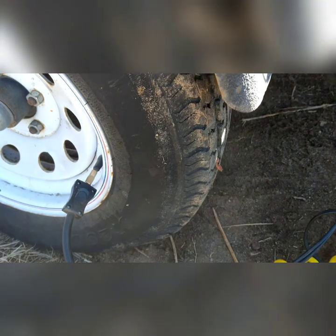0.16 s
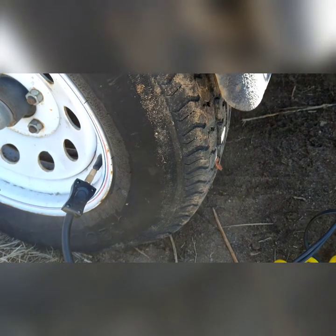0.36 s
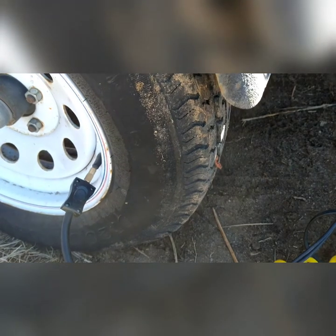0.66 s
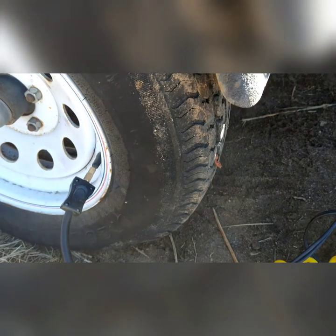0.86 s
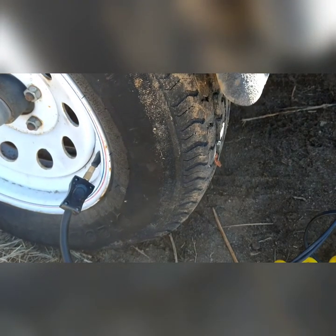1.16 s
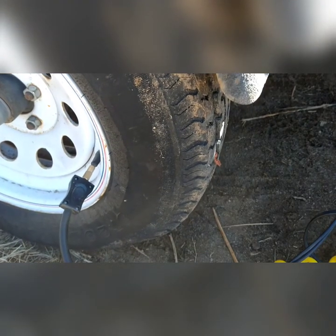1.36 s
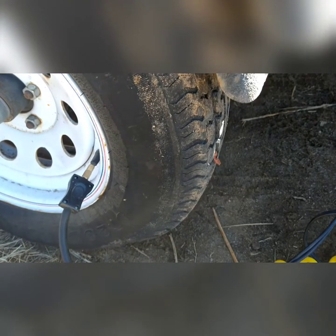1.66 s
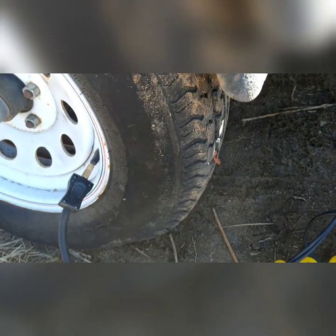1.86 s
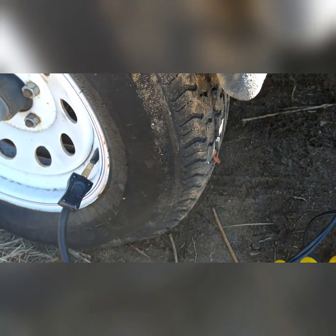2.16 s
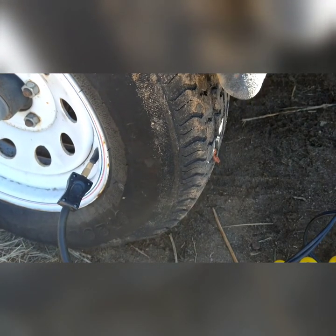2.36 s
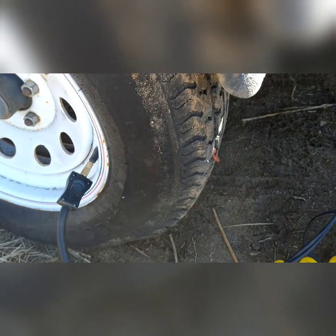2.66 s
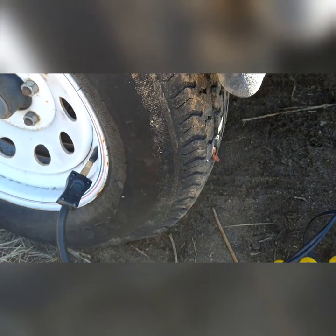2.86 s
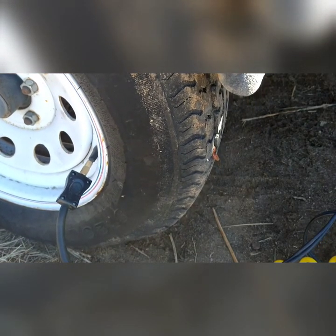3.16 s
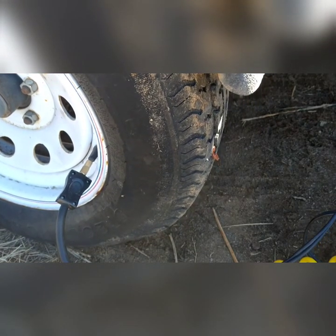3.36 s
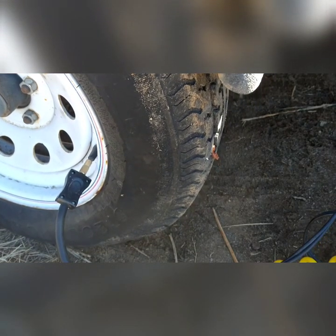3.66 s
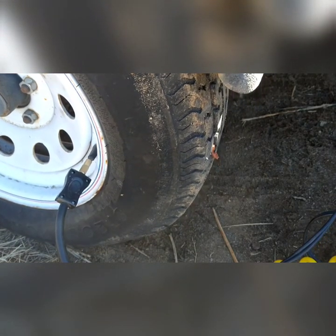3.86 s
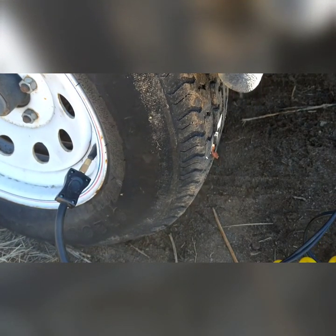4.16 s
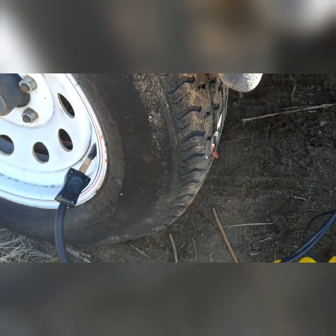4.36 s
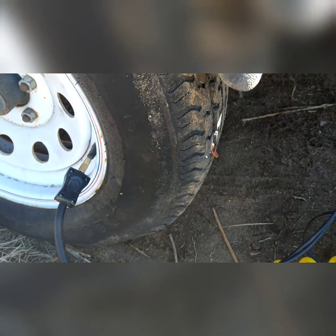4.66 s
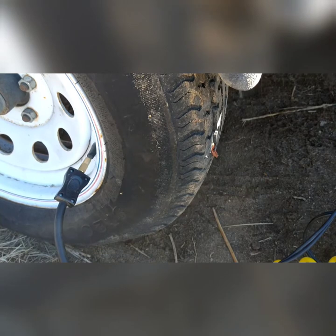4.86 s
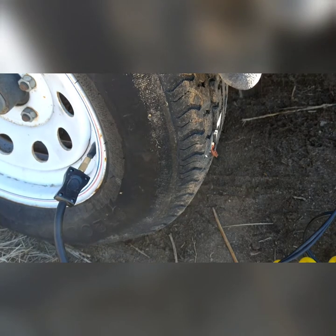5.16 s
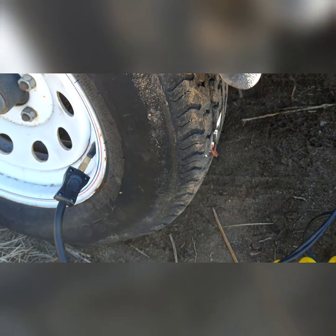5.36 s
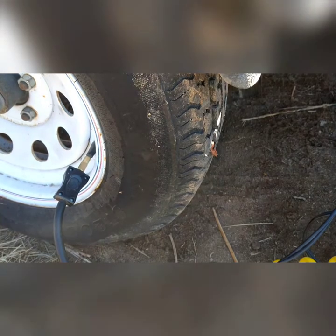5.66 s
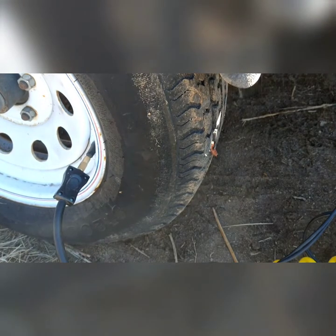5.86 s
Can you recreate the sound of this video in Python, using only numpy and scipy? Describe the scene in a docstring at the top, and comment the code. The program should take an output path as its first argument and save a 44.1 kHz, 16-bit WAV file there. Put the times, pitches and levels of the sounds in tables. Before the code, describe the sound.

Even, raspy buzzing of a little piston pump filling a car tyre, opening with a loud hissy burst and a brief rattle.

```python
"""A small piston compressor pumps up a tyre outdoors, about 53 strokes a second.
Each stroke is a rising whoop through the pump's resonances, built from harmonics and heard as a buzz;
noise-burst ticks of valves and rod ring the plastic casing, and filtered noise hisses as air.
It is louder and hissier for half a second and a loose part rattles for about one; as the tyre fills
it speeds up a little and changes colour. Outdoor rumble, faint gliding hums and soft scuffs lie behind."""
import sys
import numpy as np
from scipy import signal
from scipy.fft import rfft, irfft
from scipy.io import wavfile
from scipy.ndimage import uniform_filter1d

SR = 44100
rng = np.random.default_rng(int(sys.argv[2]) if len(sys.argv) > 2 else 0)


def store_pcm(level_fs):
    """Save levels as 16-bit WAV."""
    pcm = np.round(np.clip(level_fs, -1, 1) * 32767).astype(np.int16)
    wavfile.write(sys.argv[1], SR, np.atleast_2d(pcm).T)


N = 264600
TIME = np.arange(N) / SR
FREQS = np.arange(N // 2 + 1) * SR / N

# Spectrum of the outdoor background. Each row: frequency in Hz, relative level in dB.
OUTDOOR_SPECTRUM = [(20, -24), (60, -6), (100, 0.5), (200, -29), (500, -9), (1500, -7.5), (6000, -30),
                    (15000, -45)]
# Far hums that glide down. Each row: start in seconds, length in seconds, starting pitch in Hz,
# peak level in dB.
FAR_HUMS = [(4.48, 0.39, 104, -57), (4.497, .5, 138, -49), (4.833, 0.38, 116, -51),
            (4.795, 0.28, 208, -53.5), (5.097, 0.38, 110, -54), (5.64, .32, 104, -55)]
# Soft scuffs. Each row: start in seconds, length in seconds, level at the height of the swell in dB.
SCUFF_EVENTS = [(-.1, .3, -41), (5.52, .3, -52)]
# Spectrum of a scuff. Each row: frequency in Hz, relative level in dB.
SCUFF_SPECTRUM = [(150, -16), (300, 5), (520, 3), (780, 10.5), (950, -11), (1130, 13), (1300, -10),
                  (1500, 3), (2000, -13), (4000, -16), (13000, -31)]
# Spectrum of air through the valves. Each row: frequency in Hz, relative level in dB.
AIR_SPECTRUM = [(40, -2.5), (150, 0), (480, 4), (850, -5.5), (1120, 3.5), (1550, -8), (2100, -13),
                (2900, -9), (3600, -12.5), (4900, -19), (6000, -24.5), (8300, -23.5), (11300, -29),
                (15500, -27.5)]
# Valve and rod ticks in each turn of the crank. Each row: position in turns, relative level in dB,
# brightest frequency in Hz.
VALVE_TICKS = [(.65, 0, 2840), (0.76, -2, 1810), (0.829, -0.5, 5000), (0.991, -3.5, 2300),
               (0.172, -3.5, 9100), (0.459, -8, 4200)]
# Spectrum of a tick's dry click. Each row: frequency in Hz, relative level in dB.
CLICK_SPECTRUM = [(1200, -26), (1600, -6.5), (1850, 5), (2100, -0.5), (2700, 0), (3250, -3.5), (3550, -14),
                  (4100, -7.5), (5000, -14.5), (5400, -17), (8500, -16.5), (11000, -20.5), (15500, -31)]
# Resonances of the plastic casing. Each row: frequency in Hz, width in Hz, relative level in dB
# with a soft tyre, relative level in dB with a hard tyre.
CASING_MODES = [(1798, 102, -5.5, -6.5), (2469, 63, -15.5, -1.5), (2772, 104, -10.5, -6.5),
                (3990, 75, -3, -21), (4300, 45, -58, -36), (4880, 67, -35, -8), (5640, 110, -52.5, -14.5),
                (6640, 150, -19, -25.5), (9000, 120, -38, -28.5), (9370, 78, -24, -23),
                (12000, 200, -20.5, -38.5), (13450, 220, -43, -24)]
# Resonances of the loose part. Each row: frequency in Hz, width in Hz, relative level in dB.
LOOSE_MODES = [(1750, 54, 0.5), (2200, 33, -10), (2570, 34, -7), (2770, 32, -9.5), (3142, 57, -10.5),
               (4200, 210, -38)]
# Registers of the pump that each stroke sweeps upward through. Each row: lowest frequency in Hz,
# highest frequency in Hz, start of the sweep in turns, end of the sweep in turns.
WHOOP_REGISTERS = [(51.4, 612, -0.317, 0.4204), (632, 865, -0.14, 0.15), (873, 1190, -.21, 0.298),
                   (1191, 1630, -0.064, 0.183), (1620, 1860, -.22, -0.13)]
# Resonances of pump and housing, each radiating from its own place. Each row: frequency in Hz,
# width in Hz, level in dB with a soft tyre, level in dB with a hard tyre,
# left minus right in dB, lateness of the left ear in ms.
BODY_MODES = [(86.4, 52, -39.5, -41, -0.5, 0.4), (287.4, 152, -44.5, -42, -2.5, 0.39),
              (371.5, 98, -37.5, -41.5, 3.0, 0.34), (494.6, 95.2, -41, -37, -1.0, 0.35),
              (601, 67, -74, -51.5, -15, 0.45), (696, 112, -47, -48.5, 11, 0.38),
              (812, 135, -58, -49, 7, 0.81), (901, 215, -63.5, -49.5, 0, 0.3),
              (1094.6, 68.3, -37, -48.5, -7, 0.35), (1189.7, 51, -36, -46, -0.5, 0.32),
              (1307, 59.5, -53, -48.5, -4, 0.44), (1456, 116, -48, -57, -3.5, 0.38),
              (1800, 350, -63.5, -62, 2, 0.36)]
# Brief dips of the buzz, where the sound skips ahead by part of a turn.
# Each row: time in seconds, dip in dB.
BUZZ_SKIPS = [(1.177, -9), (2.592, -7.5)]

OUTDOOR_SWELL_DB = 1.2  # spread of the background's slow level changes
HUM_SAG_HZ_PER_S = 138
CLICK_RISE_S = .0018  # a click peaks after this time, then dies away
# the motor gains a little speed and levels off
START_TURN, START_RPM, GAIN_RPM, SPEED_UP_S = -.41, 3145.2, 57.1, 2.46
SKIP_TURNS = .16
# tyre pressure rises quickly at first, then ever more slowly (time constant)
FILL_S = 3.03
# the loud opening: when it starts to fall, how long it falls, boost of the whole machine and of air flow
OPENING_END_S, OPENING_FALL_S, OPENING_DB, OPENING_FLOW_DB = 0.491, 0.062, 6.5, 9.5
# the loose part: held back in the opening, it rattles freely, seats itself with a drop, then dies away
RATTLE_OPENING_DB, SEATS_S, SEATING_S, SEATED_DB, RATTLE_FADE_DB_PER_S = -8.5, 0.94, .1, -9, 5
NOISE_LEFT_LAG_MS = 0.3856
TOP_HZ = 15600


def undb(db):
    """Decibels to gain."""
    return 10 ** (np.asarray(db) / 20)


def level(x, db):
    """Scale to an rms level."""
    return x * undb(db) / np.sqrt(np.mean(x ** 2))


def colour(x, points):
    """Filter by a spectrum of (Hz, dB) points, joined on a log-frequency scale."""
    hz, db = np.transpose(points)
    gain_db = np.interp(np.log(FREQS + 1), np.log(hz), db)
    return irfft(rfft(x) * undb(gain_db), N)


def walk(rate):
    """Smoothed random wander with a spread near 1, drawing rate new values a second."""
    k = int(SR / rate)
    steps = np.repeat(rng.standard_normal(N // k + 1), k)
    smooth = uniform_filter1d(uniform_filter1d(steps, k), k)
    return 1.7 * smooth[:N]


def pan(db):
    """Gains of left and right for a level difference."""
    return undb(np.array([[db], [-db]]) / 2)


def stereo_noise(apart_hz):
    """Noise that is alike in both ears in the bass and unrelated far above apart_hz."""
    mid, side = rfft(rng.standard_normal((2, N)))
    spread = FREQS / (FREQS + apart_hz)
    ears = mid + np.array([[1], [-1]]) * spread * side
    return irfft(ears / np.sqrt(1 + spread ** 2), N)


def ramp(start, length):
    """A straight rise from 0 to 1."""
    return np.clip((TIME - start) / length, 0, 1)


def swell(start, length):
    """A smooth rise and fall."""
    return np.sin(np.pi * ramp(start, length))


def resonance(hz, width):
    """Frequency response of one mode, gain 1 at its centre."""
    return hz * width / (hz ** 2 - FREQS ** 2 + 1j * FREQS * width)


def outdoor_rumble(floor_db=-62):
    """Coloured noise that slowly swells and sinks around its floor level."""
    floor = level(colour(stereo_noise(apart_hz=1500), OUTDOOR_SPECTRUM), floor_db)
    return floor * undb(OUTDOOR_SWELL_DB * walk(3.08))


def far_hums():
    """Sines that sag steadily in pitch while they swell and fade."""
    out = np.zeros(N)
    for start, length, from_hz, db in FAR_HUMS:
        hz = from_hz - HUM_SAG_HZ_PER_S * length * ramp(start, length)
        out += undb(db) * swell(start, length) * np.sin(2 * np.pi * np.cumsum(hz) / SR)
    return out


def scuffs():
    """Coloured friction noise under soft swells."""
    noise = level(colour(stereo_noise(apart_hz=1500), SCUFF_SPECTRUM), 0)
    return noise * sum(undb(db) * swell(s, length) ** 2 for s, length, db in SCUFF_EVENTS)


def surroundings():
    """Rumble, far hums and scuffs behind the machine."""
    return outdoor_rumble() + far_hums() + scuffs()


def crank():
    """Turns of the crank so far: speed summed over time, with a quick jump ahead at each skip."""
    rpm = START_RPM + GAIN_RPM * (1 - np.exp(-(TIME / SPEED_UP_S) ** 2))
    turns = START_TURN + np.cumsum(rpm) / SR / 60
    return turns + SKIP_TURNS * sum(ramp(s, .0025) for s, _ in BUZZ_SKIPS)


def hiss(turns, puff_turns=0.043, steady=1.0, flutter_db=2.0, air_db=-57, pan_db=-5):
    """Air swells through the valves around each tick, over a steady rush."""
    puffs = 0
    for turn, db, _ in VALVE_TICKS:
        since_tick = (turns - turn) % 1
        puffs = puffs + undb(db) * np.exp(-((since_tick - puff_turns) / puff_turns) ** 2)
    air = stereo_noise(apart_hz=2400) * (steady + puffs) * undb(flutter_db * walk(120))
    return pan(pan_db) * level(colour(air, AIR_SPECTRUM), air_db)


def blows(turns, turn, scatter_db=0.95, jitter_ms=0.016):
    """Spectrum of one blow in every turn, never quite alike in time or strength."""
    at = np.interp(np.arange(-1, np.ceil(turns[-1])) + turn, turns, TIME)
    late, size = rng.standard_normal((len(at), 2)).T
    i = np.round((at + late * jitter_ms / 1000) * SR).astype(int)
    inside = (at > 0) & (at < TIME[-1]) & (i >= 0) & (i < N)
    return rfft(np.bincount(i[inside], undb(scatter_db * size[inside]), N))


def dry_clicks(tick_hits, flow_db, click_db=-59.0, focus_db=5, treble_hz=2700):
    """Each tick repeats its own short noise burst, focused around its brightest frequency."""
    spectrum = 0
    for hit, (_, _, bright_hz) in zip(tick_hits, VALVE_TICKS):
        burst = rfft(stereo_noise(apart_hz=2390) * TIME * np.exp(-TIME / CLICK_RISE_S))
        # falls by focus_db per octave to either side
        focus = undb(-focus_db * np.abs(np.log2((FREQS + 1) / bright_hz)))
        spectrum = spectrum + hit * burst * focus
    clicks = level(colour(irfft(spectrum, N), CLICK_SPECTRUM), click_db)
    # stronger air flow snaps the valves harder, which brightens the clicks
    treble = irfft(rfft(clicks) / (1 + (treble_hz / (FREQS + 1)) ** 2) ** 2, N)
    return clicks + (undb(flow_db) - 1) * treble


def casing_ring(hits, pressure, ring_db=-60.0):
    """The blows ring the casing's modes, whose balance shifts as the tyre hardens."""
    rings = np.zeros(N)
    for k, (hz, width, soft_db, hard_db) in enumerate(CASING_MODES):
        strength = undb(soft_db + (hard_db - soft_db) * pressure)
        # neighbouring modes swing in opposite directions
        rings += (-1) ** k * strength * irfft(hits * resonance(hz, width), N)
    return level(rings, ring_db)


def loose_part(hits, rattle_db, loose_db=-51):
    """The same blows shake a loose part's modes, under its own level curve."""
    response = sum((-1) ** k * undb(db) * resonance(hz, width)
                   for k, (hz, width, db) in enumerate(LOOSE_MODES))
    return undb(rattle_db) * level(irfft(hits * response, N), loose_db)


def clatter(turns, pressure, rattle_db, flow_db, pan_db=-2):
    """Each tick has its own soft click; together they ring the casing and shake a loose part."""
    tick_hits = [undb(db) * blows(turns, turn) for turn, db, _ in VALVE_TICKS]
    hits = sum(tick_hits)
    clicks = dry_clicks(tick_hits, flow_db)
    return pan(pan_db) * (clicks + casing_ring(hits, pressure) + loose_part(hits, rattle_db))


def buzz(turns, pressure, waver_db=0.31, count=36):
    """Stroke harmonics through the body; the shrinking air space rings ever higher, so highs come later."""
    hz, width, soft_db, hard_db, pan_db, lag_ms = np.transpose(BODY_MODES)
    strength = undb(soft_db[:, None] + np.outer(hard_db - soft_db, pressure))
    out, delay = np.zeros((2, N)), 0
    rate = (turns[-1] - turns[0]) / TIME[-1]  # mean strokes a second
    for order in range(1, count + 1):
        harmonic_hz = order * rate
        bell = 1 / (1 + (2 * (harmonic_hz - hz) / width) ** 4)
        late = np.exp(-2j * np.pi * harmonic_hz * lag_ms / 1000)
        ears = bell * np.array([undb(pan_db / 2) * late, undb(-pan_db / 2)])
        angle = 2 * np.pi * (order * turns - delay)
        tone = ears.real @ strength * np.cos(angle) - ears.imag @ strength * np.sin(angle)
        out += undb(waver_db * walk(7.2)) * tone
        # phase adds up from harmonic to harmonic, which bends the stroke into a rising sweep
        register = sum(harmonic_hz > high for _, high, _, _ in WHOOP_REGISTERS[:-1])
        low, high, first, last = WHOOP_REGISTERS[register]
        delay += np.interp(harmonic_hz, [low, high], [first, last])
    return out


def compressor(dip_s=0.0043, hiss_follows=0.69):
    """Crank and tyre pressure drive buzz, clatter and hiss; the noises lean a little to the right."""
    turns = crank()
    pressure = 1 - np.exp(-TIME / FILL_S)
    opening = 1 - ramp(OPENING_END_S, OPENING_FALL_S)
    flow_db = OPENING_FLOW_DB * opening
    rattle_db = RATTLE_OPENING_DB * opening + SEATED_DB * ramp(SEATS_S, SEATING_S)
    rattle_db = rattle_db - RATTLE_FADE_DB_PER_S * np.maximum(TIME - SEATS_S, 0)
    dips_db = sum(db * np.exp(-((TIME - s) / dip_s) ** 2) for s, db in BUZZ_SKIPS)
    air = undb(hiss_follows * flow_db) * hiss(turns)
    left, right = clatter(turns, pressure, rattle_db, flow_db) + air
    # the noises reach the left ear late
    noises = np.array([np.interp(TIME - NOISE_LEFT_LAG_MS / 1000, TIME, left), right])
    return undb(OPENING_DB * opening) * (undb(dips_db) * buzz(turns, pressure) + noises)


def scene():
    """Surroundings with the compressor in front."""
    return surroundings() + compressor()


def record(dry):
    """The recorder cuts the top with a steep elliptic low-pass."""
    low_pass = signal.ellip(10, .1, 80, TOP_HZ, fs=SR, output="sos")
    return signal.sosfilt(low_pass, dry)


dry = scene()
out = record(dry)
store_pcm(out)
```